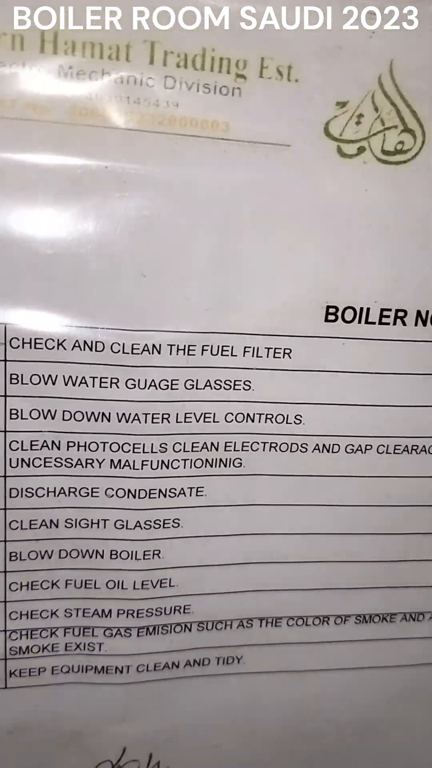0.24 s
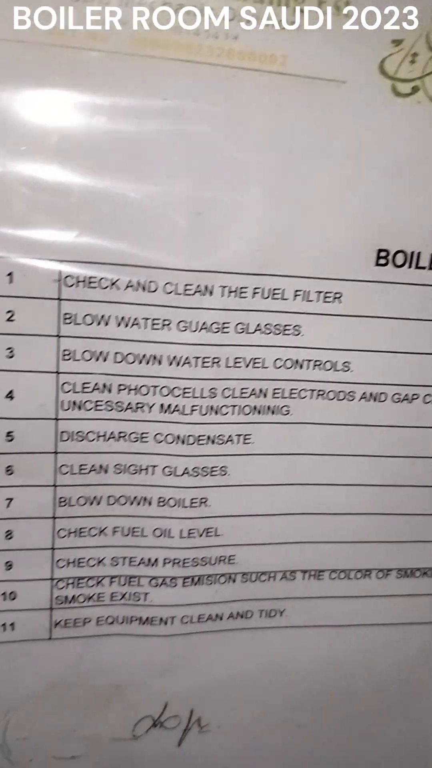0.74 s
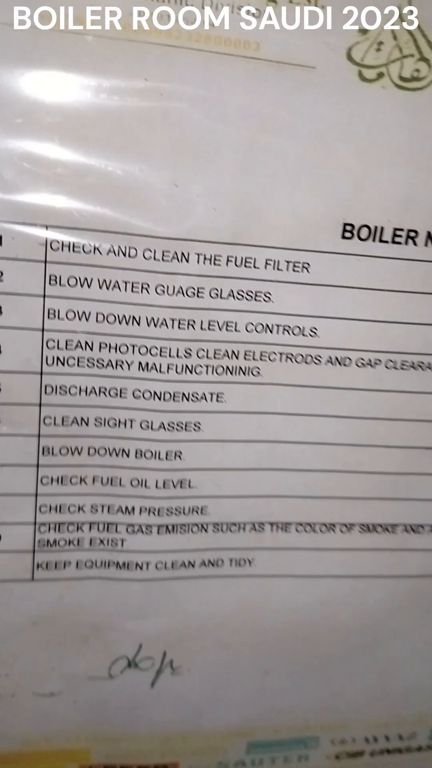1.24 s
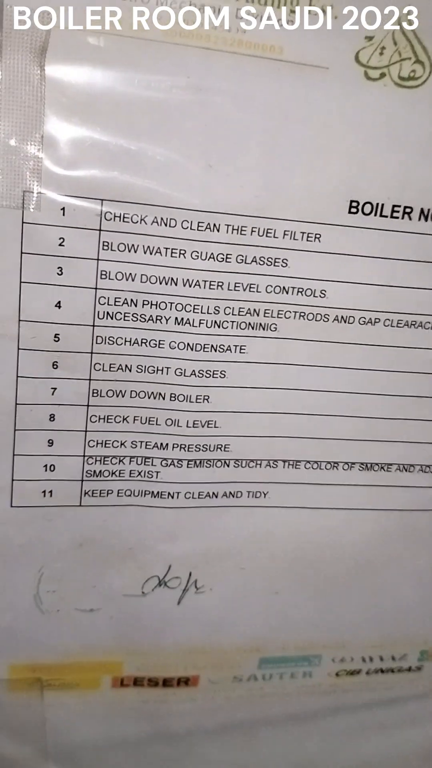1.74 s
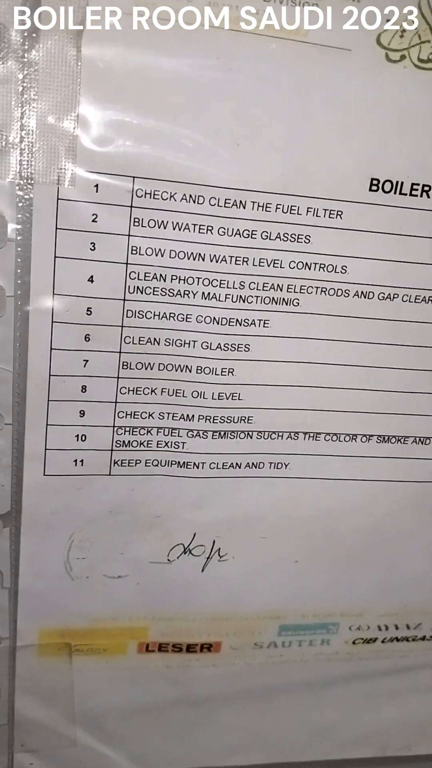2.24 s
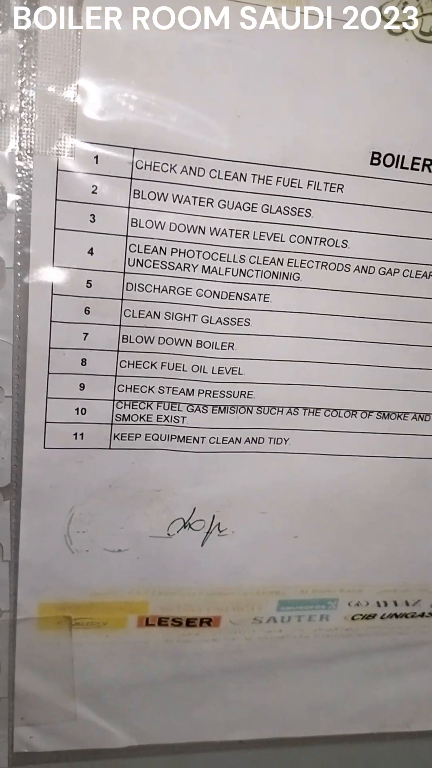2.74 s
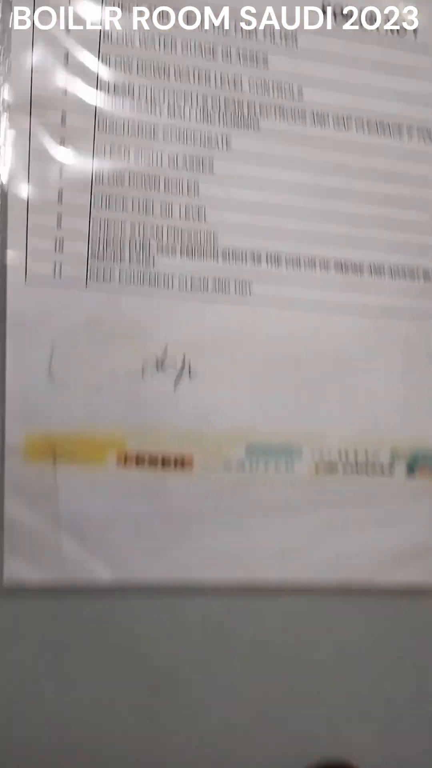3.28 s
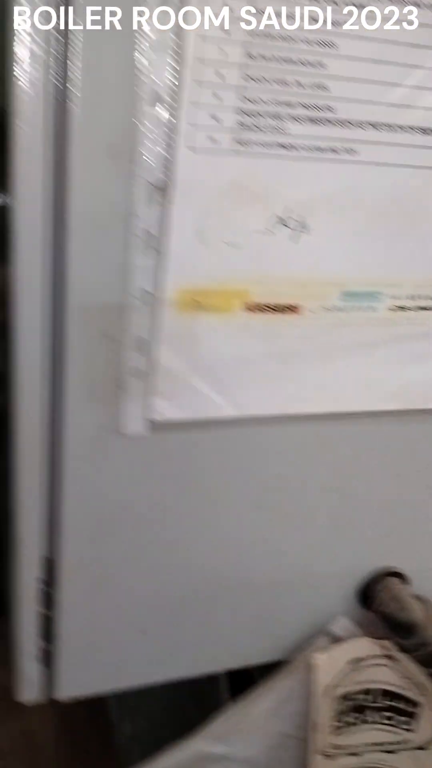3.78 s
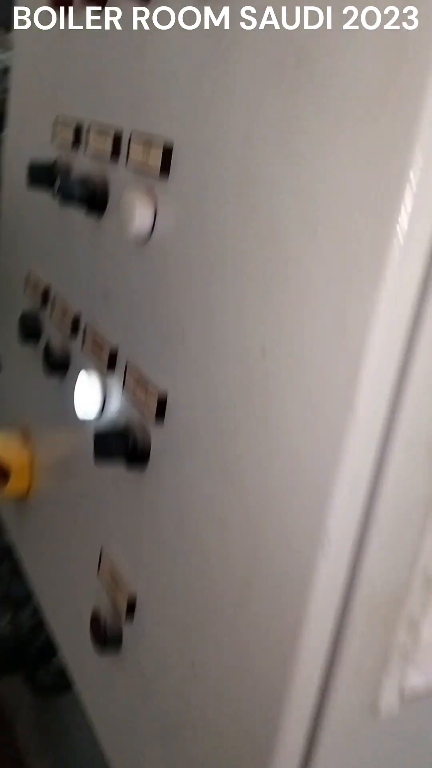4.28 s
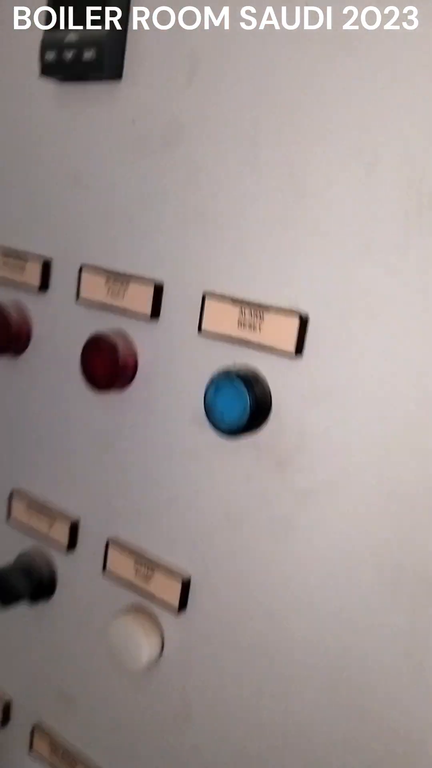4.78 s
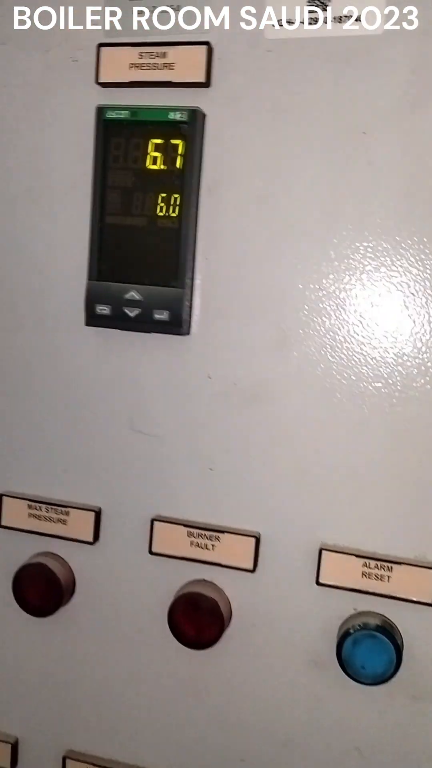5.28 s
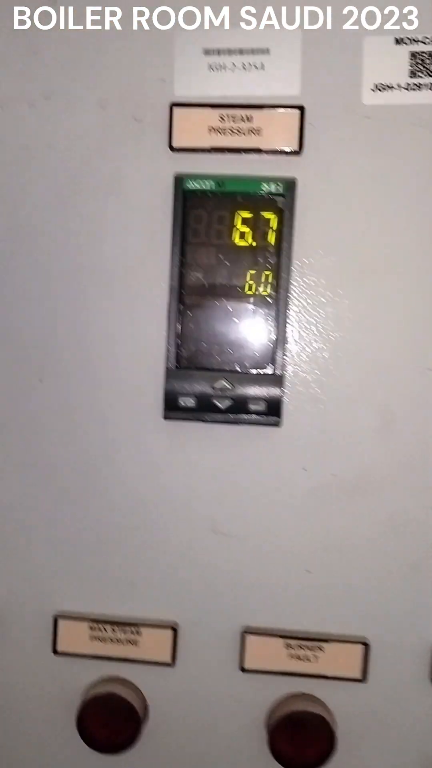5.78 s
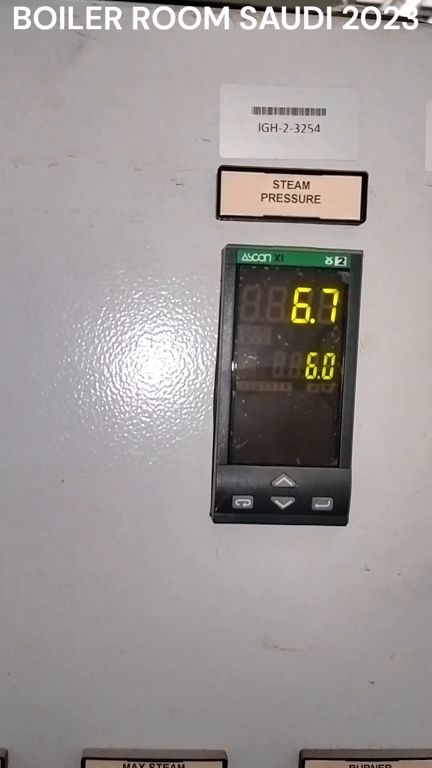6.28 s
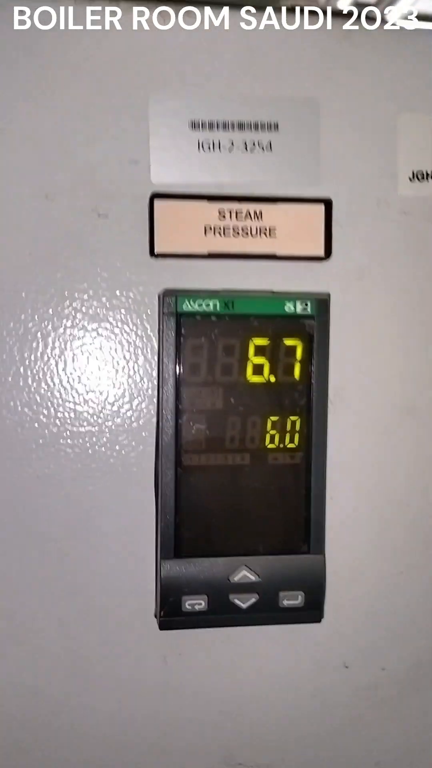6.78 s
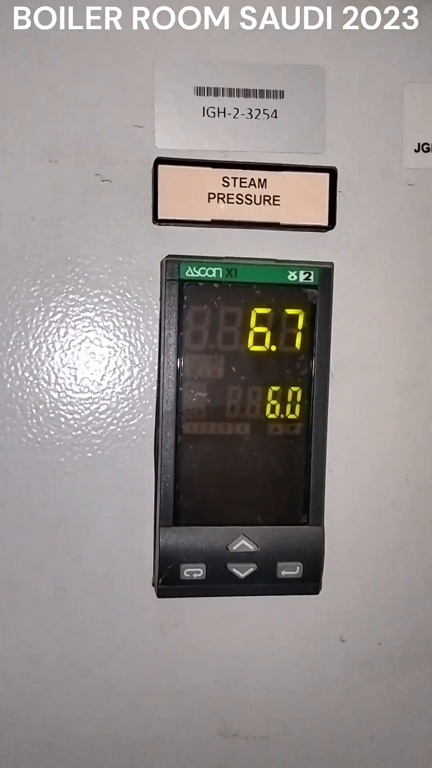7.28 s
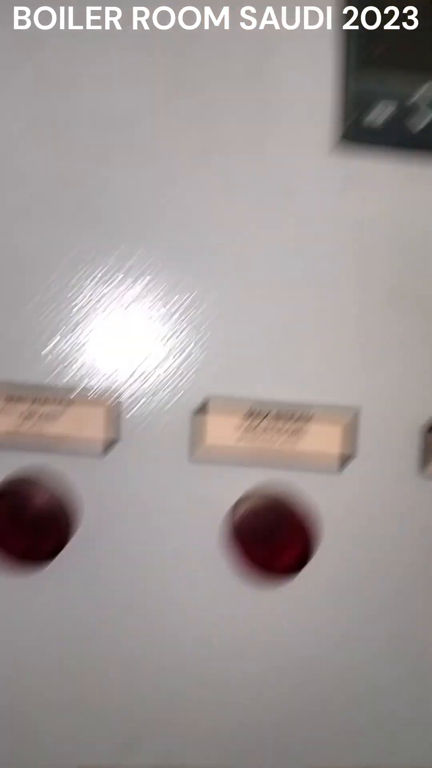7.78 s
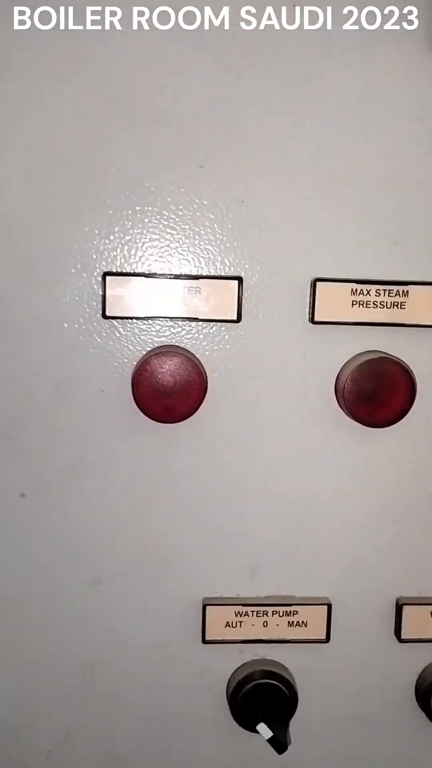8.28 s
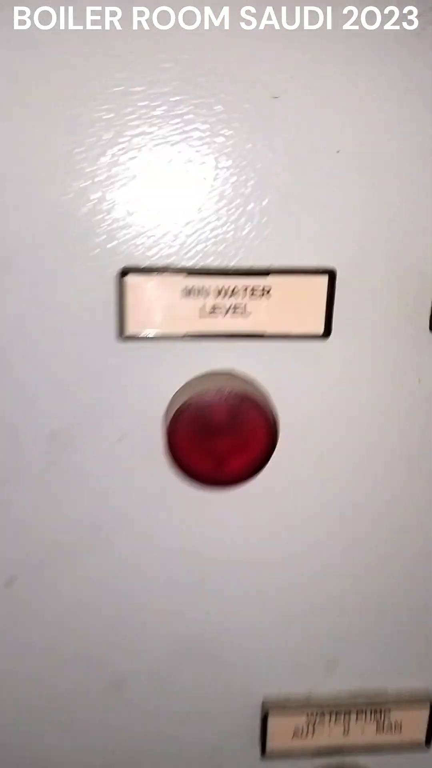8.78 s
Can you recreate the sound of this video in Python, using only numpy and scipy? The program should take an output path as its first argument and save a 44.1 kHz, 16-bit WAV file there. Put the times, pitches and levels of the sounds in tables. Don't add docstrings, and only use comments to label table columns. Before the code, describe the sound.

Constant industrial boiler roar with low hum and drifting motor whine, interrupted halfway by a sharp metal door slam that rattles and echoes.

```python
import sys
import numpy as np
from scipy import signal
from scipy.fft import irfft, next_fast_len
from scipy.io import wavfile
from scipy.ndimage import uniform_filter1d

SR = 44100
rng = np.random.default_rng(int(sys.argv[2]) if len(sys.argv) > 2 else 0)


def gain_from_db(level_db):
    decades = np.asarray(level_db, float) / 20
    return 10 ** decades


def to_wav(s):
    ch = np.atleast_2d(s).T
    pcm = np.round(np.clip(ch, -1, 1) * 32767)
    wavfile.write(sys.argv[1], SR, pcm.astype(np.int16))


N = 398223
SHAFT_HZ, MAINS_HZ, BEARING_HZ, PUMP_HZ = 29.41, 60, 90.85, 629.2
SLOT_HZ = 40 * SHAFT_HZ + 2 * MAINS_HZ


def evened(x):
    return x / np.sqrt(np.mean(abs(x) ** 2) + 1e-20)


def read(points, hz):
    f, value = np.transpose(points)
    return np.interp(np.log(hz + 1), np.log(f + 1), value)


def columns(rows, at):
    first, *values = np.transpose(rows)
    return np.array([np.interp(at, first, v) for v in values])


def smoothed(x, bins, frames):
    x = uniform_filter1d(x, size=bins, axis=0)
    return evened(uniform_filter1d(x, size=frames, axis=1))


# [freq_hz, level_db per Hz]
ROAR_SPECTRUM = [(60, -27), (120, -12), (170, -4), (250, 1), (330, -4.5), (450, -5), (620, -4.5), (900, -5),
                 (1350, -5.5), (1950, -14), (2550, -11.5), (3050, -15.5), (3600, -15), (4000, -17.5)]
# [time_s, level_db, left_minus_right_db]
MIC_DRIFT = [(0.0, -24.5, 1), (1.5, -24.5, 2.5), (4.5, -25, 2.5), (9.03, -25.5, 2.5)]
# [freq_hz, likeness]
PORT_LIKENESS = [(60, 0.73), (120, 1), (230, 0.89), (450, 0.56), (890, 0.039), (1740, 0.01), (3410, 0.01),
                 (6690, -0.04)]
# [freq_hz, left_minus_right_db]
ROAR_LEAN = [(60, -3.5), (130, 1), (290, 0), (630, -0.5), (1390, 2), (3050, 0.5), (4000, 1.5)]


def roar():
    hop = 512
    frames, hz = N // hop + 5, np.fft.rfftfreq(2048, 1 / SR)
    frame_s = np.arange(frames) * hop / SR
    a, b, c, d, peaks, flame = rng.standard_normal((frames, 1025, 6)).T
    peaks = smoothed(peaks, 2, 90)
    flame = smoothed(flame, 24, 8)
    pan_db = columns(MIC_DRIFT, frame_s)[1]
    bass_swell_db = 5.5 * evened(uniform_filter1d(flame[0], size=50)) - 1.5
    peak_db = 1.72 / (1 + hz / 900)
    field_db = read(ROAR_SPECTRUM, hz)[:, None] + peak_db[:, None] * peaks + 0.51 * flame
    field_db += np.outer(1 / (1 + (hz / 150) ** 4), bass_swell_db)

    same = np.clip(read(PORT_LIKENESS, hz), -1, 1)[:, None]
    left = a + 1j * b
    right = same * left + np.sqrt(1 - same ** 2) * (c + 1j * d)
    lean_db = read(ROAR_LEAN, hz)[:, None] + np.outer(hz / (hz + 500), pan_db - 0.5)
    ports = np.array([left * gain_from_db(lean_db / 2), right / gain_from_db(lean_db / 2)])
    noise = signal.istft(ports * gain_from_db(field_db), nperseg=2048, noverlap=2048 - hop)[1][:, :N]
    level_db = columns(MIC_DRIFT, np.arange(N) / SR)[0]
    return evened(noise) * gain_from_db(level_db + 5.0)


def zones(rows, t):
    centre_s, length_s = np.transpose(rows)[:2, :, None]
    return np.cos(np.pi * np.clip((t - centre_s) / length_s, -.5, .5)) ** 2


def standing(rows, least_db, t):
    return gain_from_db(least_db) + gain_from_db(np.transpose(rows)[2]) @ zones(rows, t)


# [centre_s, length_s, left_db, right_db, left_lead_turns]
WHINE_ZONES = [(.56, 1.52, -22, -28.5, -.32), (1.06, .83, -22.5, -29, -.21),
               (1.54, .85, -25.5, -27.5, -.22), (2.1, 1.0, -29, -35, -.2), (2.88, 1.4, -24, -25, -.25),
               (3.33, .7, -29, -28.5, -.15), (3.63, .45, -28, -28, -.18), (3.98, .5, -23, -30, 0.),
               (4.2, .35, -28, -45, .3), (4.5, .66, -34.5, -29.5, -.2), (4.85, .38, -24.5, -26.5, .05),
               (5.24, .45, -31, -24, .25), (5.45, .6, -37, -26, .42), (5.9, 1.01, -27.5, -27, .06),
               (6.61, 1.32, -24, -35, -.31), (7.55, 3.0, -25, -38, -.28), (8.11, .85, -22.5, -22.5, .34),
               (8.54, .78, -23.5, -22, .35), (9.2, 1.3, -33, -31.5, .13)]


def slot_whine(t):
    left_db, right_db, lead = np.transpose(WHINE_ZONES)[2:]
    phase = np.exp(2j * np.pi * np.outer([.5, -.5], lead))
    at_ports = gain_from_db(np.array([left_db, right_db])) * phase
    return (at_ports @ zones(WHINE_ZONES, t) * np.exp(2j * np.pi * SLOT_HZ * t)).imag


# [centre_s, length_s, level_db]
BLADE_ZONES = [(.05, 2.7, -29.5), (2.76, 0.52, -32.5), (4.14, 3.55, -32), (6.27, 2.2, -33),
               (7.1, 1.15, -30), (8.0, 1.96, -30.5), (9.0, 1.6, -32.5)]


def blade_hum(t):
    lean = gain_from_db(1.5 * np.array([[.5], [-.5]]))
    return lean * standing(BLADE_ZONES, -48, t) * np.sin(2 * np.pi * 7 * SHAFT_HZ * t)


# [centre_s, length_s, level_db]
SHAFT_3_ZONES = [(1.8, 4.0, -49), (4.8, 4.0, -51)]
# [centre_s, length_s, level_db]
MAINS_4_ZONES = [(.8, 4.0, -38), (3.0, 2.4, -39.5), (6.1, 2.9, -34.5), (7.5, 1.4, -37), (8.4, 1.9, -40)]
# [centre_s, length_s, level_db]
SHAFT_9_ZONES = [(.71, .63, -37), (1.47, .75, -35.5), (3.27, .6, -41), (4.3, 1.2, -36), (6.8, 1.1, -41),
                 (8.6, 2.4, -35.5)]
# [centre_s, length_s, level_db]
PUMP_TONE_ZONES = [(.9, 4.0, -43), (2.76, 3.1, -40), (4.66, .9, -38.5), (6.43, 2.6, -41),
                   (8.27, 1.2, -42.5)]
LOW_FLOOR_DB = [-65.5, -50.5, -49, -43.5]


def low_tones(t):
    tone_hz = np.array([3 * SHAFT_HZ, 4 * MAINS_HZ, 9 * SHAFT_HZ, PUMP_HZ])[:, None]
    right_lag = tone_hz / PUMP_HZ * .9
    tables = (SHAFT_3_ZONES, MAINS_4_ZONES, SHAFT_9_ZONES, PUMP_TONE_ZONES)
    strength = np.array([standing(rows, db, t) for rows, db in zip(tables, LOW_FLOOR_DB)])
    ports = [strength * np.sin(2 * np.pi * tone_hz * t - lag) for lag in (0, right_lag)]
    return np.array(ports).sum(axis=1)


def fading(tones):
    size = next_fast_len(2 * N)
    lines = np.zeros((2, size // 2 + 1), complex)
    for hz, db in tones:
        shift_hz = rng.standard_normal((3, 6)) * (.12 + hz / 2500)
        turn = np.exp(2j * np.pi * rng.random((3, 6))) / np.sqrt(6)
        same = 1 / (1 + (hz / 450) ** 2)
        at = np.round((hz + shift_hz) * size / SR).astype(int)
        for port in (0, 1):
            own = port + 1
            lines[port, round(hz * size / SR)] += gain_from_db(db) * 1.6 * same
            np.add.at(lines[port], at[0], gain_from_db(db) * np.sqrt(same) * turn[0])
            np.add.at(lines[port], at[own], gain_from_db(db) * np.sqrt(1 - same) * turn[own])
    return irfft(lines, size)[:, :N] * size / np.sqrt(2)


# [order, level_db]
SHAFT_ORDERS = [(2, -66), (6, -45), (11, -46), (18, -44.5), (21, -44), (28, -46), (70, -53), (80, -55),
                (85, -53), (86, -52), (90, -52), (108, -56), (115, -57), (120, -55)]
# [mains_multiple, level_db]
MAINS_HUM = [(6, -46), (10, -46.5)]
# [bearing_multiple, level_db]
BEARING_COMB = [(10, -48), (11, -47), (14, -43), (15, -40), (16, -44), (17, -48), (18, -51), (20, -46),
                (21, -51), (32, -57)]
# [freq_hz, level_db]
PUMP_TONES = [(626.5, -45), (509.4, -46), (1306.1, -42), (1449.5, -46), (1085.4, -47)]
# [shaft_orders_away, mains_multiples_away, level_db]
WHINE_NEIGHBOURS = [(1, 0, -43), (-1, 2, -57.5), (0, 2, -45.5), (1, 2, -47.5), (9, 0, -50), (10, 0, -54)]


def faint_tones():
    tones = [(k * SHAFT_HZ, db) for k, db in SHAFT_ORDERS]
    tones += [(k * MAINS_HZ, db) for k, db in MAINS_HUM]
    tones += [(k * BEARING_HZ, db) for k, db in BEARING_COMB]
    tones += list(PUMP_TONES)
    tones += [(SLOT_HZ + k * SHAFT_HZ + m * MAINS_HZ, db) for k, m, db in WHINE_NEIGHBOURS]
    return fading(tones)


def motor():
    t = np.arange(N) / SR
    return np.sqrt(2) * (slot_whine(t) + blade_hum(t) + low_tones(t)) + faint_tones()


def resonate(x, hz, width_hz):
    return signal.lfilter(*signal.iirpeak(hz, hz / max(width_hz, 5), SR), x)


# [freq_hz, width_hz, level_db]
PANEL_MODES = [(560, 150, -6), (800, 300, -2), (1060, 200, 0), (1389, 150, -3), (1685, 100, -6.5),
               (1798, 90, -5), (2000, 700, -2), (2450, 400, -8), (3600, 1200, -3), (5300, 1800, 0)]


def panel_rattle(t, db, centre_hz, t60_s):
    envelope = gain_from_db(-60 * t / t60_s) * (1 - np.exp(-t / 0.0039))
    chatter = rng.standard_normal((len(PANEL_MODES), len(t))) * envelope
    out = np.zeros(len(t))
    for noise, (hz, width_hz, mode_db) in zip(chatter, PANEL_MODES):
        ring = resonate(resonate(noise, hz, width_hz), hz, 2 * width_hz) * np.sqrt(SR / width_hz / 4)
        out += gain_from_db(db + mode_db - 4.2 * np.log2(hz / centre_hz) ** 2) * ring
    return out


# [freq_hz, level_db, t60_s]
LEAF_MODES = [(109, -8.5, 0.16), (161.5, -6.5, 0.15), (224.5, -2.5, 0.094), (276.4, -0.5, 0.12),
              (397, -4.5, 0.14)]


def leaf_thud(t, db):
    out = np.zeros(len(t))
    for hz, mode_db, t60_s in LEAF_MODES:
        swell = 1 - np.exp(-t * hz / 0.48)
        struck_hz = hz * rng.uniform(0.927, 1.07)
        out += swell * gain_from_db(db + mode_db - 60 * t / t60_s) * np.sin(2 * np.pi * struck_hz * t)
    return out


# [start_s, rattle_db, rattle_centre_hz, rattle_t60_s, thud_db]
DOOR_BLOWS = [
    (4.342, -23, 805, 0.063, -4),
    (4.347, -2, 1270, 0.098, -17.5),
    (4.358, -13.5, 3970, 0.44, -30),
    (4.398, -21, 1700, 0.07, -20),
    (4.411, -12, 4800, 0.4, -33),
    (4.459, -15, 1700, 0.1, -12.5),
    (4.550, -16, 1000, 0.15, -20),
]


def door():
    t, out = np.arange(SR // 2) / SR, np.zeros(N)
    for start_s, rattle_db, centre_hz, t60_s, thud_db in DOOR_BLOWS:
        part = out[round(start_s * SR):][:len(t)]
        part += panel_rattle(t, rattle_db, centre_hz, t60_s) + leaf_thud(t, thud_db)
    return out


# [freq_hz, t60_s]
HALL_DECAY = [(100, 0.62), (300, 1), (1000, 0.81), (3000, 0.87), (6000, 0.26)]


def hall(x):
    taps = np.zeros((2, SR))
    at = np.arange(300, SR - 20, 20) + rng.integers(0, 20, (2, (SR - 301) // 20))
    np.put_along_axis(taps, at, rng.choice([-1., 1.], at.shape), 1)
    hz, t, z = signal.stft(taps, SR, nperseg=512)
    same = np.clip(read(PORT_LIKENESS, hz), 0, 1)[:, None]
    z[1] = same * z[0] + np.sqrt(1 - same ** 2) * z[1]
    decay = gain_from_db(-60 * t / read(HALL_DECAY, hz)[:, None])
    tail = signal.istft(z * decay, SR, nperseg=512)[1]
    return signal.fftconvolve(x[None], tail / np.linalg.norm(tail[0]), axes=1)[:, :N]


def scene():
    bang = door()
    right_lag_s = .00048
    direct = np.array([bang, np.roll(bang, round(right_lag_s * SR))])
    direct_gain, hall_gain = gain_from_db(np.array([[-3.2], [-6.]])), gain_from_db(np.array([[-7.], [-8.5]]))
    return roar() + motor() + direct * direct_gain + hall_gain * hall(bang)


# [lowest_hz, highest_hz]
TOP_EDGE_RANGE = [(5300, 7600), (6700, 7600)]


def ragged_top(x):
    hz, t, z = signal.stft(x, SR, nperseg=2048)
    low_hz, high_hz = np.transpose(TOP_EDGE_RANGE)[:, :, None]
    chance = rng.random((len(t), 2))[np.arange(len(t)) // 2].T
    edge_hz = np.maximum(low_hz + (high_hz - low_hz) * chance, 6300)
    return signal.istft(z * (hz[:, None] < edge_hz[:, None]), SR, nperseg=2048)[1][:, :N]


# [freq_hz, left_db, right_db]
PORT_RESPONSE = [(3950, 0.4, 0.38), (4250, -5.5, -2), (4500, -12, -7.5), (4870, -10, -8.5),
                 (5830, -17.5, -10), (6290, -30.5, -20.5), (6940, -37.5, -27.5), (7770, -47, -43),
                 (9000, -88, -89.5)]


def microphone(dry):
    hz = np.linspace(0, SR / 2, 513)
    ports = [signal.firwin2(511, hz, gain_from_db(db), fs=SR, window=("kaiser", 9)) for db in columns(PORT_RESPONSE, hz)]
    heard = signal.oaconvolve(dry, np.array(ports), "same", axes=1)
    heard = signal.sosfilt(signal.butter(2, 70, "high", fs=SR, output="sos"), heard)
    ceiling, knee = .85, 6
    return heard / (1 + (heard / ceiling) ** knee) ** (1 / knee)


def band_limit(x):
    return signal.sosfilt(signal.butter(12, 15720, fs=SR, output="sos"), x)


def record(dry):
    hiss = gain_from_db(-90.5) * rng.standard_normal(dry.shape)
    mix = ragged_top(microphone(dry)) + hiss
    return band_limit(mix)


dry = scene()
out = record(dry)
to_wav(out)
```